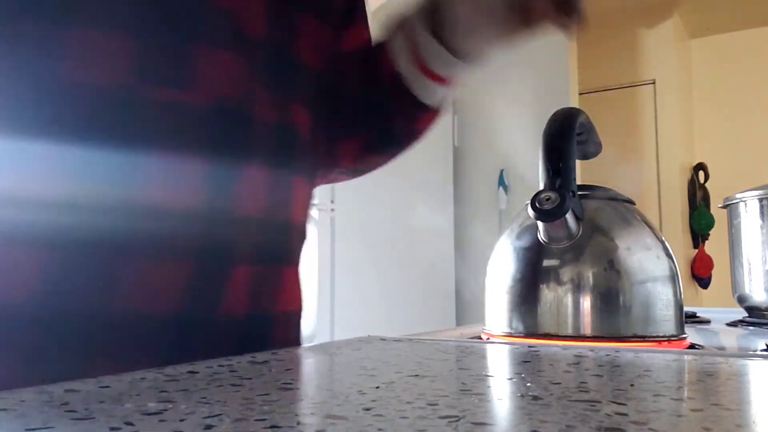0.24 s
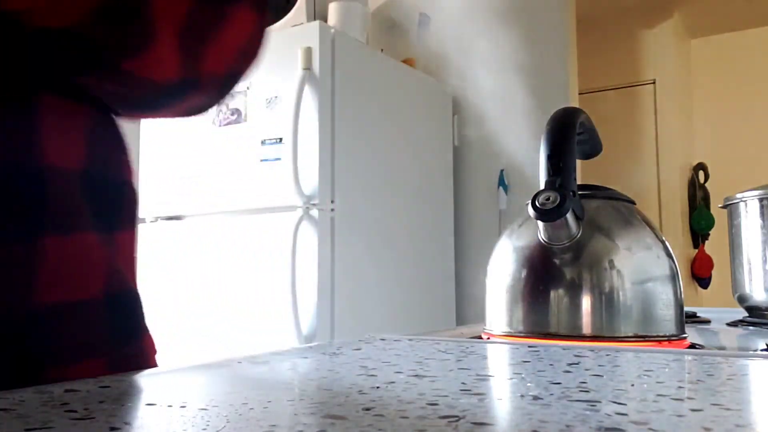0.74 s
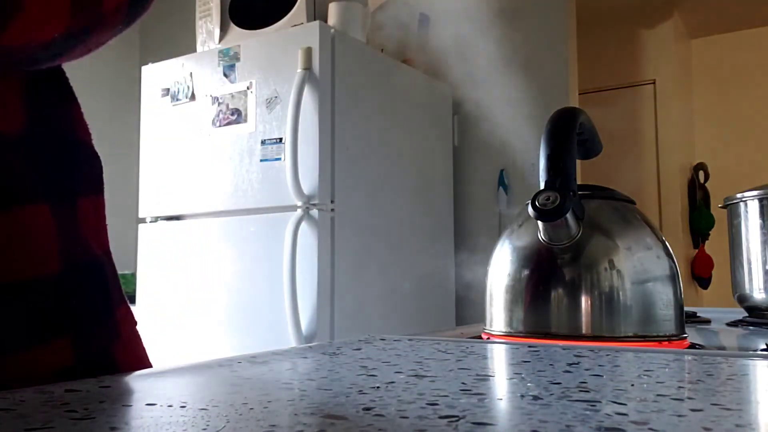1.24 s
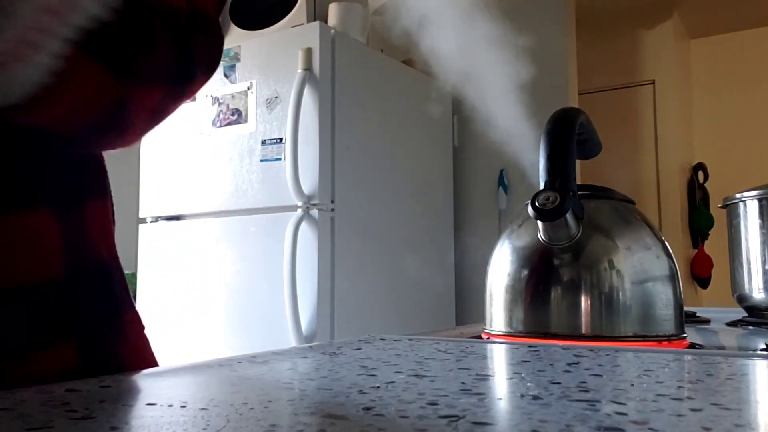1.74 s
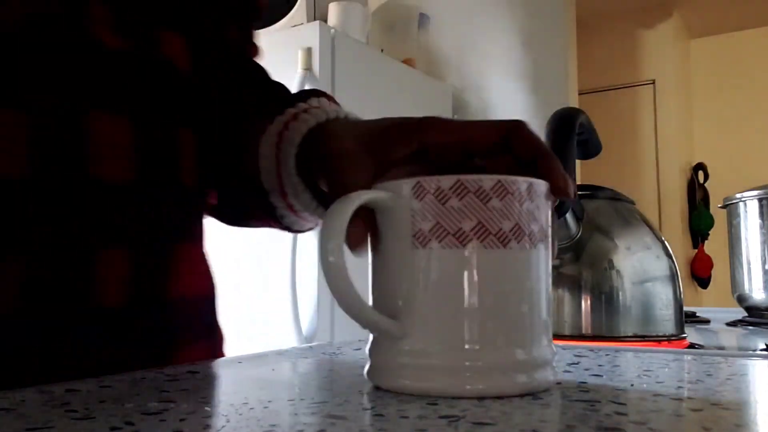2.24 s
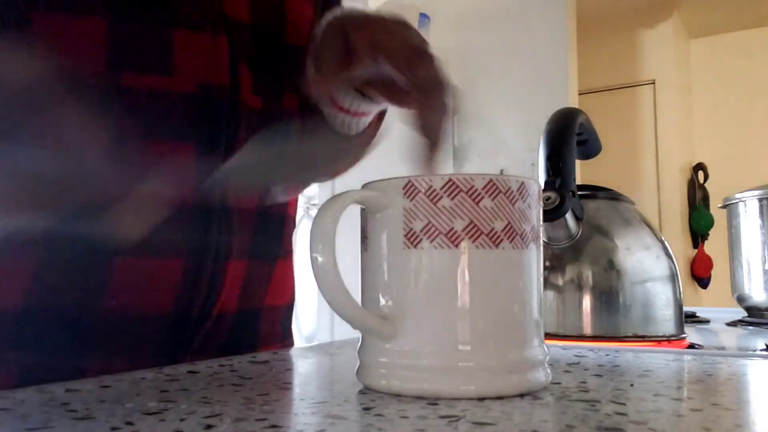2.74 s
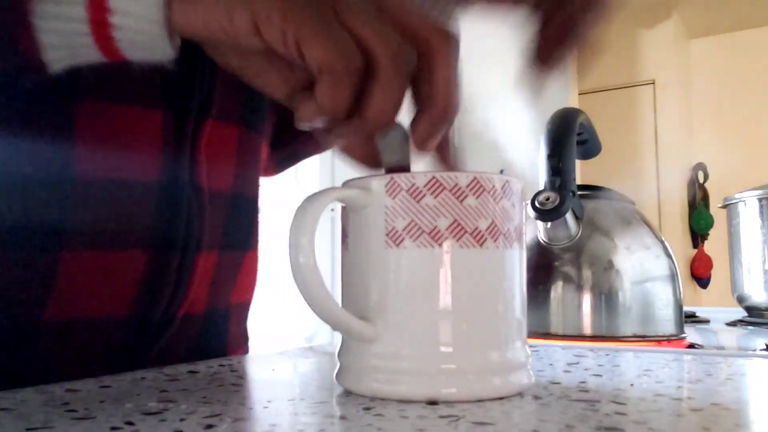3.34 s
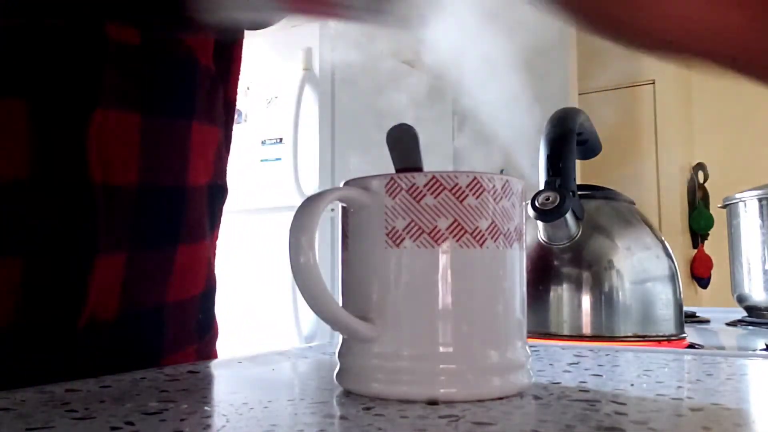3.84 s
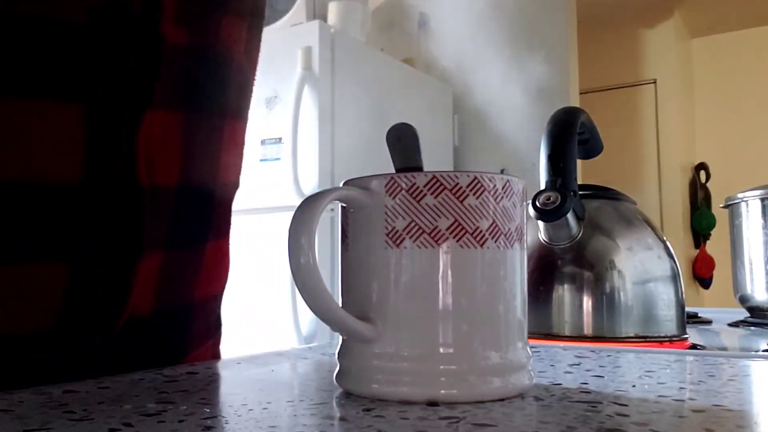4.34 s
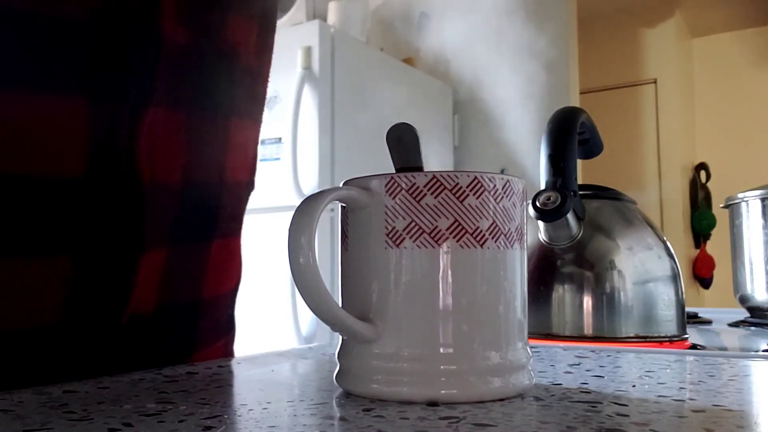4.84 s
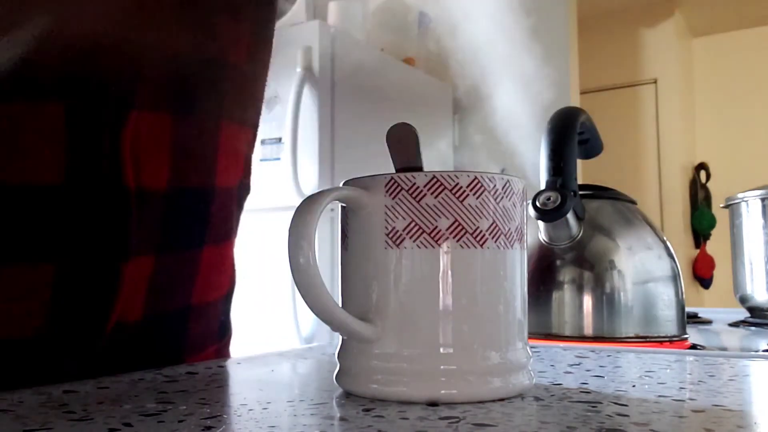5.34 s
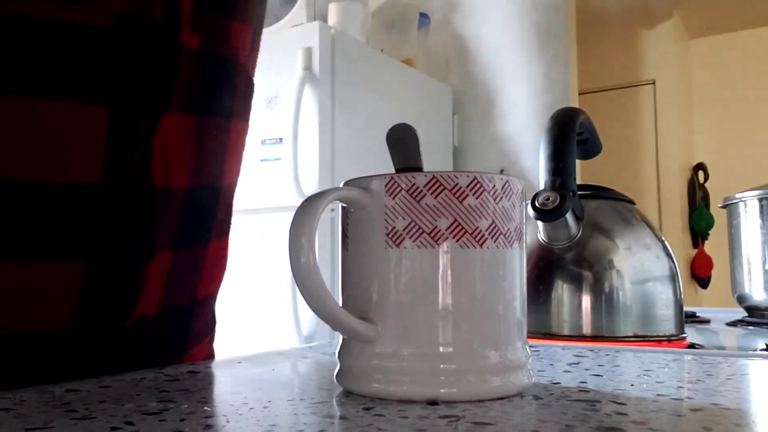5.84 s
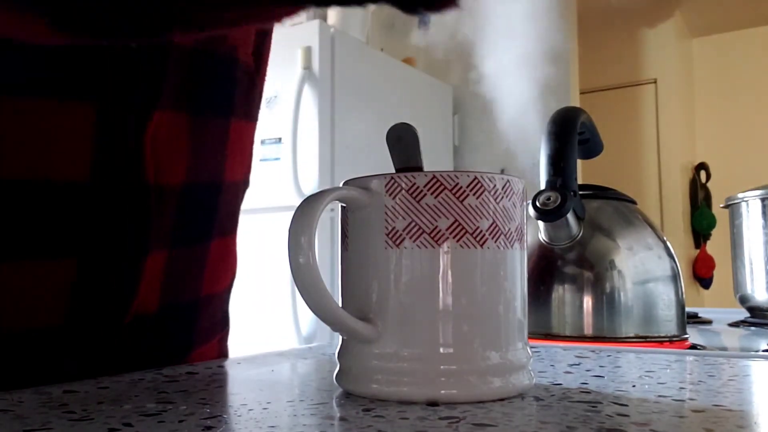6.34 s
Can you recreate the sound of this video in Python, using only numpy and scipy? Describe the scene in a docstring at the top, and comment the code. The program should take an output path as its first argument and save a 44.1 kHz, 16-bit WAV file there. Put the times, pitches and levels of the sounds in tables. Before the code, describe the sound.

A steel kettle whistles throughout, about a metre away in a kitchen. The tone is very high, wavering and slightly rough, with steam hiss and a faint rumble of boiling water beneath it. It eases around 4 seconds, then grows again slightly lower in pitch.

The handling sounds are close to the microphone on the counter. A spoon clinks brightly at about 0.5 seconds and lightly near 1, and something small and hard clicks at 1.4. A mug is set down with a double knock at 2.3. The spoon clatters against the mug from 3.4 to 3.6. A jar clunks and rattles softly between 4 and 4.9, with a sharper clack at 5.3. A wrapper crackles from 5.9 to 6.5, over three faint, dull dragging hums. At about 6.55 the counter is bumped hard, a loud, deep thump with sharp clicks.

```python
"""Kettle whistling in a kitchen

A steel kettle at the boil, a metre from a phone lying on the counter. The steam jet sings on two
wavering cavity tones that mix; water rumbles and steam hisses under it. Close to the two microphone
ports a spoon clinks, something small and hard ticks, a mug is set down, a jar is handled, a wrapper
crackles, and last the counter is bumped hard."""
import sys
import numpy as np
from scipy import signal
from scipy.fft import rfft, irfft, next_fast_len
from scipy.io import wavfile
from scipy.ndimage import uniform_filter1d

SR = 44100
rng = np.random.default_rng(int(sys.argv[2]) if len(sys.argv) > 2 else 0)


def unload_wav(signal):
    """Save mono or channel-first audio to the path in sys.argv[1] as 16-bit WAV at rate SR, clipped to [-1, 1]."""
    wavfile.write(
        sys.argv[1],
        SR,
        np.round(np.clip(np.atleast_2d(signal).T, -1, 1) * 32767).astype(np.int16),
    )


N = 290619
T = np.arange(N) / SR
FFT_SIZE = next_fast_len(N, True)
STOVE_LAG_S = 0.00028  # sound from the stove side reaches the right port first
SPOUT_LAG_S = 0.0002343  # the spout lies at a flatter angle


def whistle():
    """Turbulence shakes the jet's pitch; a weak lower tone, noise in a cavity mode, mixes with it."""
    # the jet between gusts: time_s, pitch_hz, level_db
    jet = [(0, 4960, -21), (.1, 5029, -19.5), (.55, 4856, -21), (.93, 4942, -21.5), (.98, 4809, -18),
           (1.2, 4914, -22), (1.45, 4871, -19.5), (1.8, 4957, -22.5), (2.25, 4954, -26.5),
           (2.45, 4870, -26), (3.0, 4933, -25.5), (3.4, 4874, -25.5), (3.9, 4892, -30.5), (4.15, 4910, -30),
           (4.4, 4873, -24), (4.75, 4900, -25), (5.35, 4746, -24), (5.72, 4705, -27.5), (6.1, 4768, -23.5),
           (6.59, 4815, -20.5)]
    # its colour, the last three against its level: time_s, pan_db, octave_db, lower_tone_db, hiss_db
    jet_colour = [(0, -1, -11.5, -24, -27), (.8, 1.5, -14, -19.5, -24), (1.5, 1.5, -16, -24, -28.5),
                  (2.2, -4.5, -9.5, -19, -21.5), (3.0, -7, -13, -20, -23), (3.6, -7, -12, -22.5, -19.5),
                  (4.0, -6, -10, -22, -20.5), (4.5, -4.5, -20, -27.5, -26), (5.5, -3.5, -20, -25.5, -22.5),
                  (6.1, -0.5, -18.5, -17.5, -22.5), (6.59, 4, -22, -27, -22)]
    # tones mixed in the jet: pitch_multiple, lower_tone_multiple, level_db
    mixed_tones = [(3, 0, -23.5), (1, 0.93, -24), (2, -0.92, -5.5), (1, -1.1, -23)]
    # spectrum of the steam: frequency_hz, density_db
    hiss_spectrum = [(700, -36), (1000, -14), (2600, -4), (4300, -4.5), (5500, 8.5), (6190, -1.5),
                     (7970, 3.5), (8940, -10.5), (9800, 8), (10700, -7), (11600, 0), (15500, 1.5)]
    gust_hz, jitter_hz, upward_skew = 45, 55, .2
    lower_ratio, flutter_hz = .595, 250
    hz, db = curves(jet)
    pan_db, octave_db, lower_db, hiss_db = curves(jet_colour)
    unrest = np.where(T < 4.4, 1, .72)  # the jet is steadier late on
    gust = wander(50)
    gust = unit_rms(gust - .8 * uniform_filter1d(gust, SR // 7))  # gusts pass quickly
    gust += .6 * wander(130)
    hz = hz + unrest * gust_hz * (gust + upward_skew * (gust ** 2 - 1))
    jitter = wander(550)
    shaken_hz = hz + unrest * jitter_hz * (jitter + upward_skew * (jitter ** 2 - 1))
    phase = 2 * np.pi * np.cumsum(shaken_hz) / SR
    flutter = (wander(flutter_hz) + 1j * wander(flutter_hz)) / np.sqrt(2)
    lower_gain = flutter * undb(lower_db + 3.5 * wander(30))
    lower_phase = 2 * np.pi * np.cumsum(lower_ratio * hz) / SR
    tone = np.sin(phase) + undb(octave_db) * np.sin(2 * phase)
    tone += (lower_gain * np.exp(1j * lower_phase)).imag
    for m, n, mix_db in mixed_tones:
        mixed = (lower_gain if n else 1) * np.exp(1j * (m * phase + n * lower_phase))
        tone += undb(mix_db) * mixed.imag
    tone *= np.sqrt(2) * undb(db + unrest * 1.5 * wander(450))
    tone *= undb(-0.5 * unrest * gust)  # weaker while a gust pushes it sharp
    steam = np.array([lumpy_noise(hiss_spectrum, swing_db=2.2, rate_hz=32) for _ in range(3)])
    steam *= undb(db + hiss_db)
    direct = ports(undb(-0.5) * tone + steam[0], pan_db, SPOUT_LAG_S)
    diffuse_steam = undb(8.5) * steam[1:]
    return direct + kitchen(tone, t60_s=.14, wet_db=-6.5) + diffuse_steam


def boil():
    """Bubbles collapse in a lumpy stream in the kettle's belly; a deeper rumble wavers under it as the phone is
    handled."""
    # course of the boil: time_s, water_db, rumble_db
    boil_levels = [(0.0, -49.5, -60.5), (0.79, -50, -52.5), (2.11, -51, -62.5), (4.77, -52.5, -54),
                   (5.05, -54, -64), (6.59, -48, -52.5)]
    # boiling water: frequency_hz, density_db
    water_spectrum = [(71, -33), (120, -6.5), (166, -2), (201, -13.5), (274, 3), (375, -12.5), (420, 1),
                      (652, 1), (986, -11.5), (2400, -27), (3120, -73), (5280, -120)]
    # deep rumble from handling: frequency_hz, density_db
    rumble_spectrum = [(15, -39), (25, -29), (45, 2), (81, 4), (189, -4), (225, 1.5), (250, 3), (320, -33),
                       (550, -120)]
    water_db, rumble_db = curves(boil_levels)
    water = np.array([lumpy_noise(water_spectrum, swing_db=1.3, rate_hz=38) for _ in range(3)])
    water *= undb(water_db)
    rumble = coloured(rng.standard_normal(N), rumble_spectrum) * undb(rumble_db + 3 + 3.5 * wander(9))
    diffuse_water = undb(-1.5) * water[1:]
    return ports(water[0], pan_db=-7) + diffuse_water + rumble


def spoon():
    """A spoon rings in high modes; the place struck decides which are strongest."""
    # modes of the spoon: pitch_hz, level_db, t60_s
    modes = [(2562, 2, .7), (3828, -18, .5), (5868, -9, .3), (6650, -16, .5), (6960, -1, .5),
             (8613, -18, .35), (9561, -11, .4), (10271, -12, .3), (10625, -12, .4), (11617, -17, .4),
             (12218, -11, .4), (12540, -9, .3), (13115, -10, .3), (13563, -9, .3), (14267, 0, .5),
             (15030, -19, .3)]
    # blows on it: start_s, level_db, favoured_hz, damped_after_s
    clinks = [(.53, -8.5, 11600, 0.013), (.535, -9.5, 6940, 0.038), (.56, -18, 12500, 0.026),
              (.59, -12, 12800, 0.017), (.957, -20, 6500, 0.029), (3.364, -9.5, 15000, 0.014),
              (3.38, -18.5, 5850, 0.029), (3.398, -18.5, 14100, 0.034), (3.434, -16, 13000, 0.034),
              (3.458, -9.5, 12400, 0.024), (3.455, -26, 2830, 0.25), (3.468, -15, 7000, 0.055),
              (3.501, -5.5, 14600, 0.01), (3.54, -12.5, 9000, 0.022), (3.558, -14.5, 11800, 0.095),
              (3.585, -23.5, 3070, 0.13), (3.6, -16.5, 10300, 0.15)]
    return strike(clinks, modes, crack_db=-15, rattle_s=.02, rattle_db=4, focus_db=11)


def small_ticks():
    """A small hard part is struck; its bright modes die almost at once."""
    # modes of the part: pitch_hz, level_db, t60_s
    modes = [(2700, 0, .02), (4300, -14, .012), (5600, -8, .015), (7060, 3, .016), (9000, -6, .008),
             (10700, -5, .015), (12400, -9, .015)]
    # blows on it: start_s, level_db, favoured_hz
    ticks = [(1.218, -23, 13000), (1.3885, -4, 6500), (1.3962, -8, 7500), (1.4025, -11, 7000),
             (1.4174, -19, 7000), (4.372, -20.5, 13000), (6.5615, 0, 11000), (6.57, 0, 11000),
             (6.574, 1, 10500), (6.58, -2, 11000), (6.586, -3, 11500)]
    return strike(ticks, modes, crack_db=-8, rattle_s=.002, rattle_db=-3, focus_db=7)


def counter_knocks():
    """The mug and other light things knock the counter's short, low modes."""
    # modes of the counter: pitch_hz, level_db, t60_s
    modes = [(165, -16, .08), (260, -13, .05), (370, -7, .05), (470, 0, .06), (635, -4, .05),
             (840, -5, .05), (1150, -9, .025), (1550, -10, .025), (2900, -22, .02)]
    # blows on it: start_s, level_db, favoured_hz
    knocks = [(.509, -32, 470), (.63, -32, 302), (.76, -31, 605), (1.206, -32, 470), (1.387, -40, 298),
              (1.516, -36, 400), (2.2695, -5.5, 577), (2.2775, -19, 800), (2.345, -5.5, 640),
              (2.385, -29.5, 470), (3.362, -20, 700), (3.398, -22, 706), (3.434, -25.5, 800),
              (3.46, -22.5, 800), (3.558, -24, 500)]
    return strike(knocks, modes, crack_db=-12, rattle_s=.0074, rattle_db=5.5, focus_db=4)


def jar():
    """A handled jar clunks and rattles; its upper modes ring longest."""
    # modes of the jar: pitch_hz, level_db, t60_s
    modes = [(130, -2, .08), (225, 0, .06), (350, -2, .07), (533, -9, .06), (640, -7, .06), (832, -11, .06),
             (1090, -12, .35), (1453, -14, .25), (1696, -15, .3), (2190, -15, .15), (2885, -18, .15),
             (3709, -20, .15)]
    # blows on it: start_s, level_db, favoured_hz, damped_after_s
    taps = [(4., -30.5, 486, 0.074), (4.254, -36.5, 503, 0.15), (4.371, -20.5, 666, 0.18),
            (4.432, -21.5, 460, .13), (4.614, -24, 286, 0.16), (4.712, -22.5, 393, 0.036),
            (4.776, -23, 186, 0.085), (4.809, -24.5, 247, .1), (4.849, -29, 423, 0.081),
            (5.283, -16, 1480, 0.054), (5.292, -11.5, 1290, 0.042), (5.324, -19.5, 990, 0.042),
            (6.146, -28, 880, 0.028), (6.51, -34, 850, 0.07)]
    return strike(taps, modes, crack_db=-1.5, rattle_s=.024, rattle_db=3, focus_db=5, crack_tilt_db=7)


def bump():
    """The slab under the phone swings; it is stiffer, so quicker, in the first swings."""
    # the blow on the slab: start_s, level_db, modes as (pitch_hz, level_db, t60_s)
    slab_blow = (6.5538, -1.5, [(92, 0, 1.5), (250, -16, .2)])
    start_s, db, modes = slab_blow
    t = np.maximum(T - start_s, 0)
    rush_rad = 5.2 * (1 - np.exp(-t / .004))
    swings = (undb(mode_db) * np.sin(2 * np.pi * hz * t + rush_rad) * decay(t, t60_s)
              for hz, mode_db, t60_s in modes)
    return -undb(db) * sum(swings)


def wrapper():
    """Creases snap as short bright cracks over a rain of smaller ones."""
    # the larger snaps: start_s, level_db, mid_against_treble_db
    cracks = [(5.905, -21.5, -1.5), (5.925, -18.5, -24), (5.9786, -23.5, 0), (6.064, -23.5, 3),
              (6.2122, -17.5, -1), (6.2209, -20, -3), (6.279, -15, -9), (6.2946, -23.5, 14),
              (6.3241, -10.5, -10), (6.349, -13, -31), (6.366, -17, -32), (6.4908, -29, 14.5),
              (6.504, -20, -4)]
    snaps, t = np.zeros(N), np.arange(SR // 20) / SR
    for start_s, db, mid_db in cracks:
        snap = rng.standard_normal(len(t)) * np.exp(-t / .0016)
        treble = unit_peak(band(snap, 5000, 12300, order=1))
        mid = unit_peak(band(snap, 220, 2500, order=1))
        i = int(start_s * SR)
        snaps[i:i + len(t)] += undb(db) * (treble + undb(mid_db) * mid)
    grains = rng.standard_normal(N) * undb(4 * rng.exponential(size=N)) * (rng.random(N) < .02)
    creases = unit_rms(band(grains, 1100, 9100, order=1))
    grip_s, let_go_s, swell_db_per_s, fade_db_per_s = 5.88, 6.32, 30, 100
    crease_db = -56 + swell_db_per_s * (np.minimum(T, let_go_s) - grip_s)
    crease_db -= fade_db_per_s * np.maximum(T - let_go_s, 0)
    return snaps + creases * undb(crease_db) * (T > grip_s)


def low_hums():
    """Three faint, dull hums swell and stop, as of something dragged on the counter."""
    # the swells: middle_s, half_length_s, pitch_hz, level_db
    hums = [(5.94, 0.038, 200, -36.5), (6.09, 0.022, 215, -40.5), (6.21, 0.023, 234.3, -38.5)]
    return sum(np.sqrt(2) * undb(db) * np.exp(-((T - s) / half_s) ** 2) * np.sin(2 * np.pi * hz * T)
               for s, half_s, hz, db in hums)


def kitchen(x, t60_s, wet_db):
    """Echoes off walls and cupboards: a decaying scatter, different at each port."""
    t = np.arange(int(t60_s * SR)) / SR
    tail = rng.standard_normal((2, len(t))) * decay(t, t60_s) * (t > .003)
    tail /= np.sqrt(np.sum(tail ** 2, axis=1, keepdims=True))
    return undb(wet_db) * signal.fftconvolve(x[None], tail, axes=1)[:, :N]


def strike(blows, modes, crack_db, rattle_s, rattle_db, focus_db, crack_tilt_db=0):
    """Each blow and its rattle ring the modes over a crack of noise; a hand or rest then damps them."""
    track, t = np.zeros(N), np.arange(SR // 2) / SR
    hz, mode_db, t60_s = np.transpose(modes)
    rings = np.sin(2 * np.pi * hz[:, None] * t) * decay(t, t60_s[:, None])
    for start_s, db, favoured_hz, *damped_after in blows:
        damp_s = damped_after[0] if damped_after else .1
        ring = undb(mode_db - focus_db * np.log2(hz / favoured_hz) ** 2) @ rings
        rattle = rng.standard_normal(SR // 8) * np.exp(-t[:SR // 8] / rattle_s)
        push = undb(rattle_db) * rattle / np.sqrt(np.sum(rattle ** 2))
        sound = unit_peak(ring + signal.fftconvolve(ring, push)[:len(t)])
        crack = unit_peak(band(rattle, favoured_hz / 3, min(3 * favoured_hz, .4 * SR)))
        octaves = np.log2(favoured_hz / np.median(hz))  # with tilt, higher blows crack harder
        sound[:len(crack)] += undb(crack_db + crack_tilt_db * octaves) * crack
        sound /= 1 + (t / damp_s) ** 4
        i = int(start_s * SR)
        track[i:i + len(t)] += undb(db) * sound[:N - i]
    return track


def ports(x, pan_db, lag_s=STOVE_LAG_S):
    """One source at the two microphone ports: the left hears it lag_s later; pan_db is left minus right."""
    hz = np.arange(FFT_SIZE // 2 + 1) * SR / FFT_SIZE
    late = irfft(rfft(x, FFT_SIZE) * np.exp(-2j * np.pi * lag_s * hz), FFT_SIZE)[:N]
    return np.array([late * undb(pan_db / 2), x * undb(-pan_db / 2)])


def lumpy_noise(spectrum, swing_db, rate_hz):
    """Coloured noise that comes in irregular puffs."""
    return coloured(rng.standard_normal(N) * undb(swing_db * wander(rate_hz)), spectrum)


def coloured(x, spectrum):
    """Filters x through (frequency_hz, density_db) points, to unit RMS."""
    hz, db = np.transpose(spectrum)
    bin_hz = np.maximum(np.arange(FFT_SIZE // 2 + 1) * SR / FFT_SIZE, 1)
    gain = undb(np.interp(np.log(bin_hz), np.log(hz), db, left=-90, right=-90))
    return unit_rms(irfft(rfft(x, FFT_SIZE) * gain, FFT_SIZE)[:N])


def wander(rate_hz):
    """Smooth random drift of unit RMS that turns about rate_hz times a second."""
    width = int(SR / rate_hz)
    return unit_rms(uniform_filter1d(uniform_filter1d(rng.standard_normal(N), width), width))


def curves(table):
    """A table's columns as signals, drawn between the times in its first column."""
    time_s, *columns = np.transpose(table)
    return [np.interp(T, time_s, column) for column in columns]


def band(x, lo_hz, hi_hz, order=2):
    return signal.sosfilt(signal.butter(order, [lo_hz, hi_hz], "band", fs=SR, output="sos"), x)


def decay(t, t60_s):
    return np.exp(-np.log(1000) * t / t60_s)


def undb(db):
    return 10 ** (np.asarray(db) / 20)


def unit_rms(x):
    return x / np.sqrt(np.mean(x ** 2))


def unit_peak(x):
    return x / np.abs(x).max()


def scene():
    """The kettle a metre off, the handling close by, and the kitchen around both."""
    bright = spoon() + small_ticks()
    dull = band(counter_knocks() + jar(), 88, 2530)  # the knocks and clunks sound only between about 90 Hz and 2.5 kHz
    bright += wrapper()
    kettle = whistle() + boil()
    near = ports(bright, pan_db=-6.5, lag_s=SPOUT_LAG_S) + ports(dull, pan_db=-8)
    echoes = kitchen(bright, t60_s=.15, wet_db=1) + kitchen(dull, t60_s=.23, wet_db=-7)
    return kettle + near + echoes + low_hums() + bump()


def record(dry):
    """The phone clips the loudest peaks and cuts the top of the treble."""
    treble_cut = signal.cheby2(18, 70, 16500, fs=SR, output="sos")
    return signal.sosfilt(treble_cut, np.clip(dry, -1, 1))


dry = scene()
out = record(dry)
unload_wav(out)
```